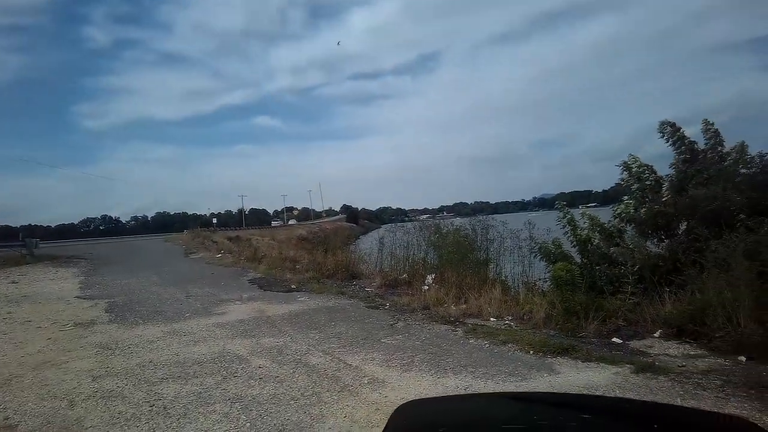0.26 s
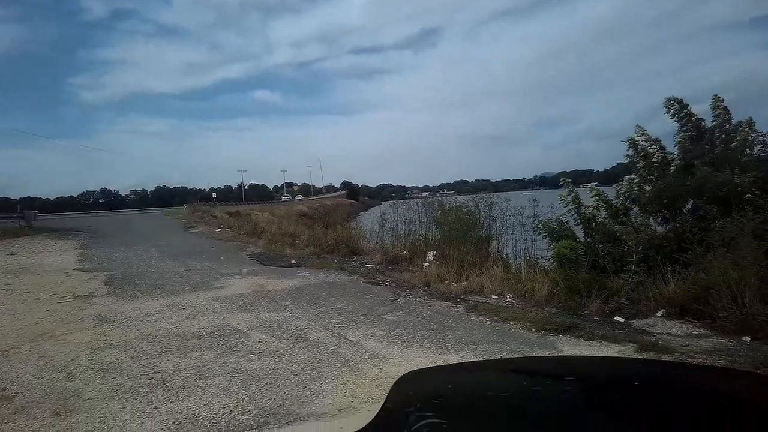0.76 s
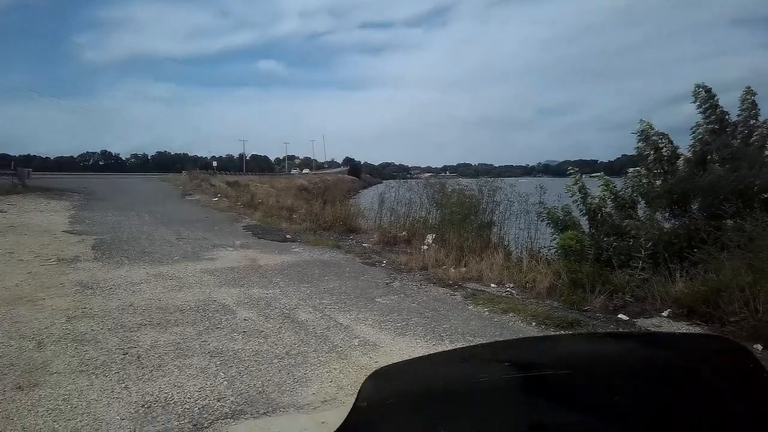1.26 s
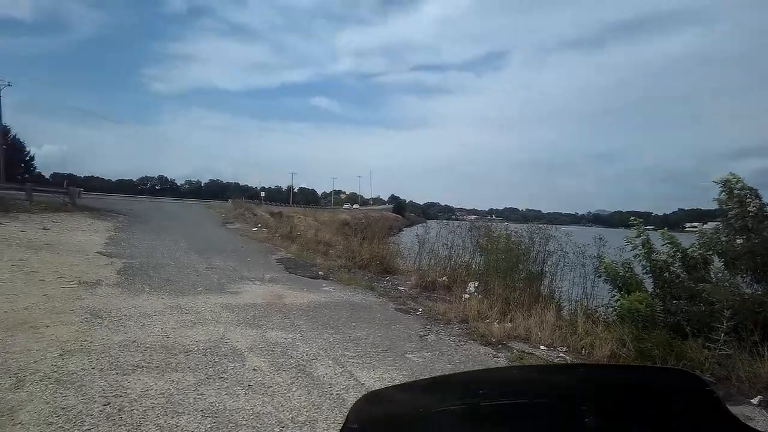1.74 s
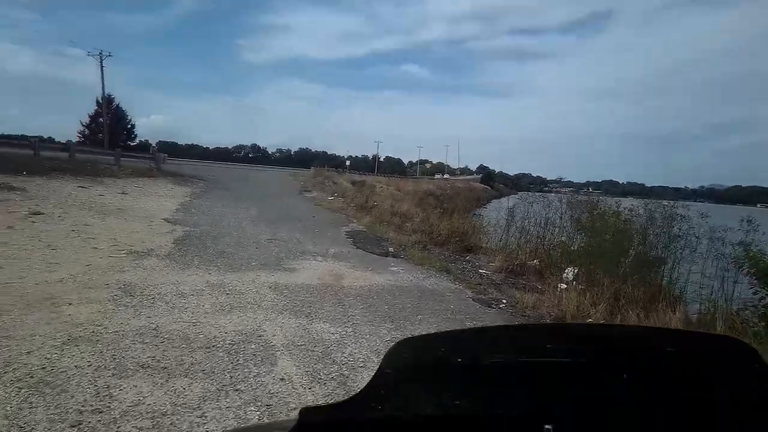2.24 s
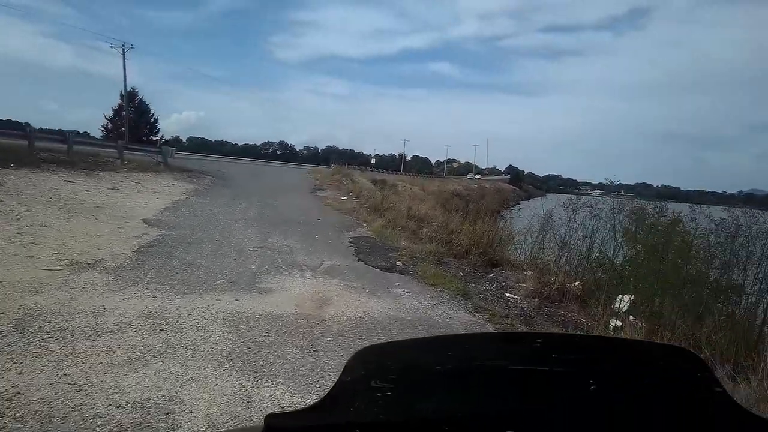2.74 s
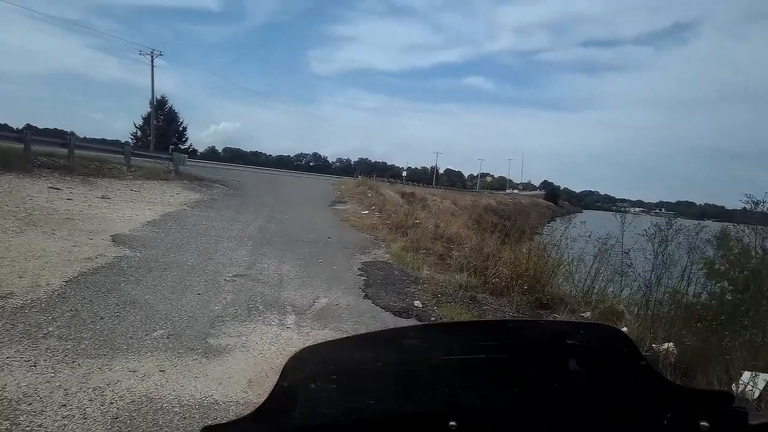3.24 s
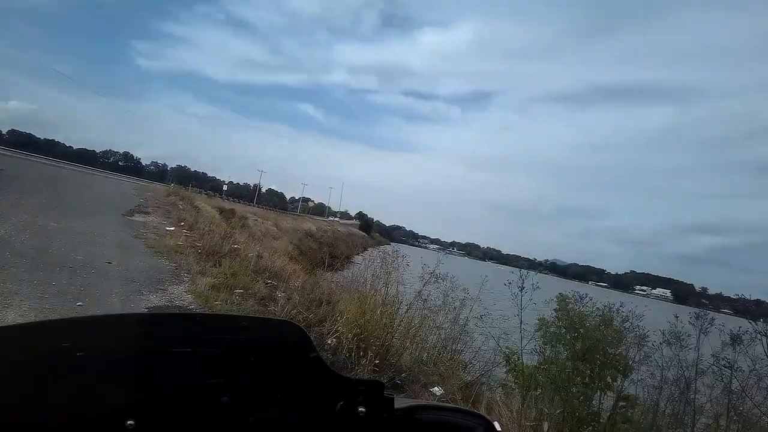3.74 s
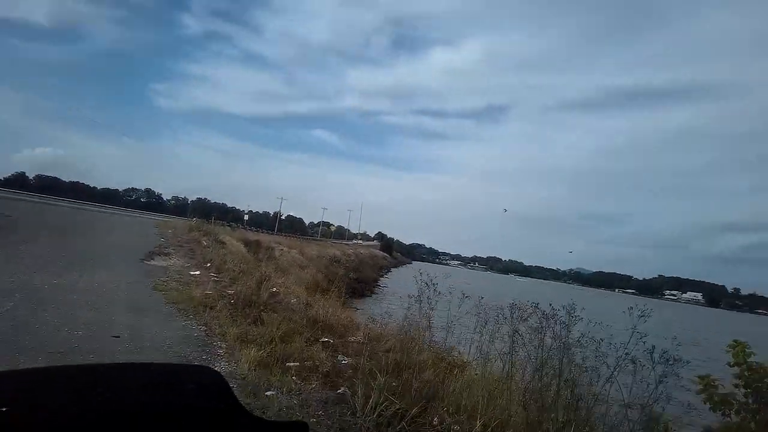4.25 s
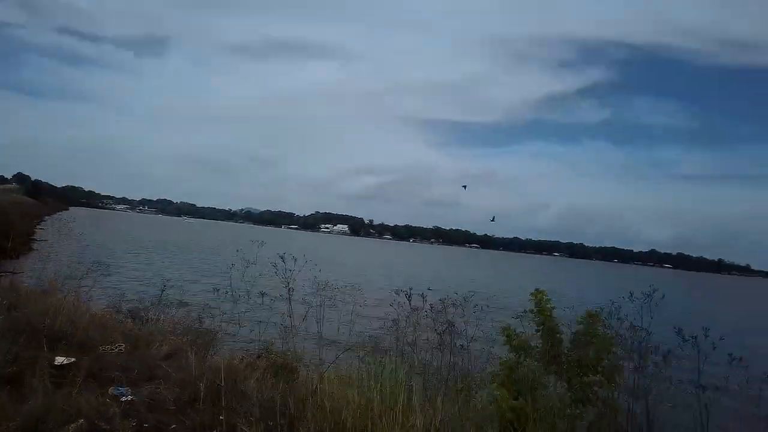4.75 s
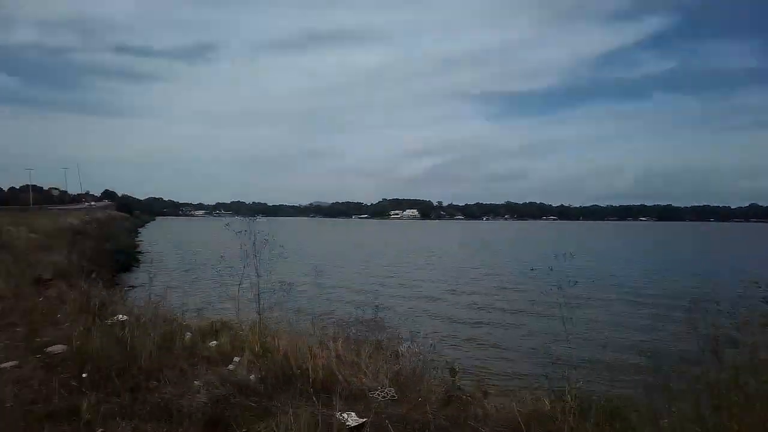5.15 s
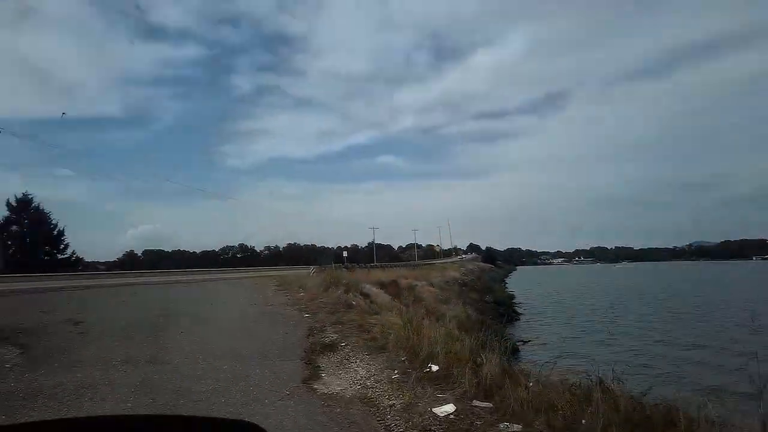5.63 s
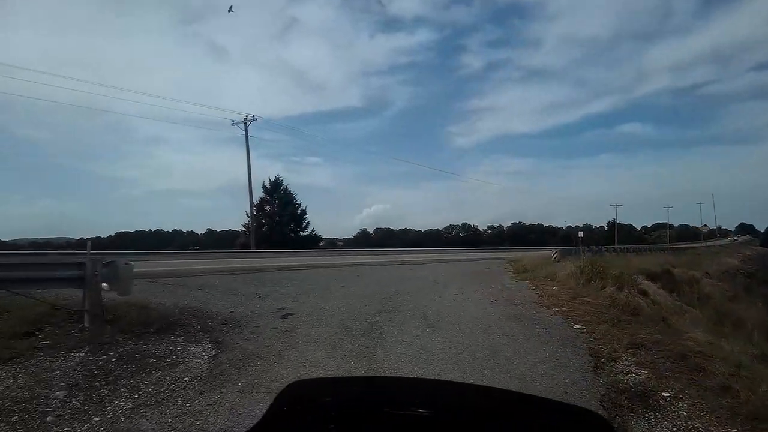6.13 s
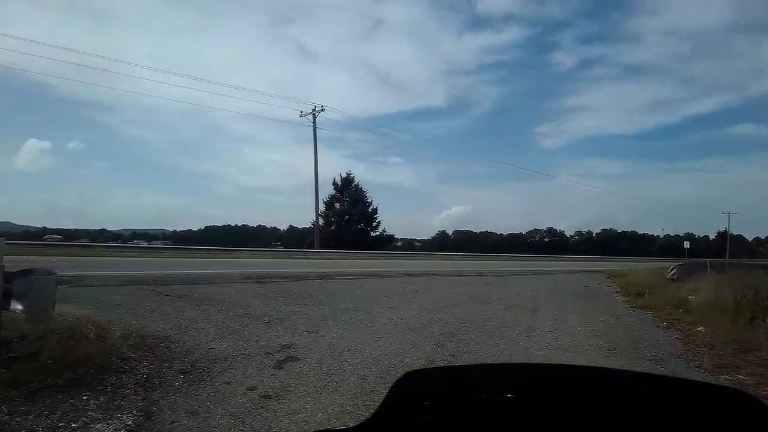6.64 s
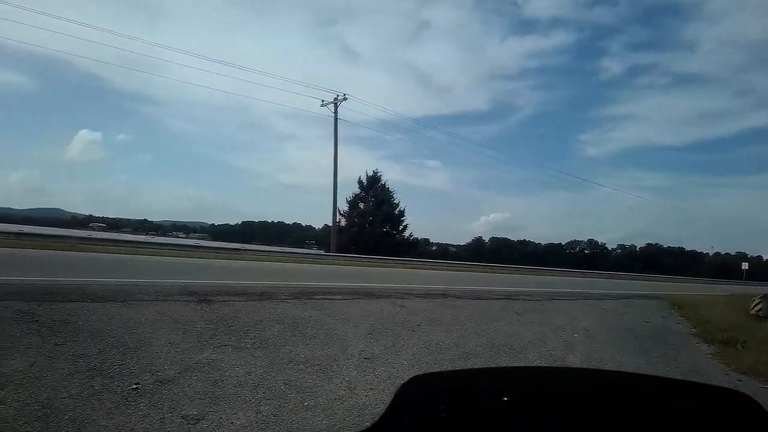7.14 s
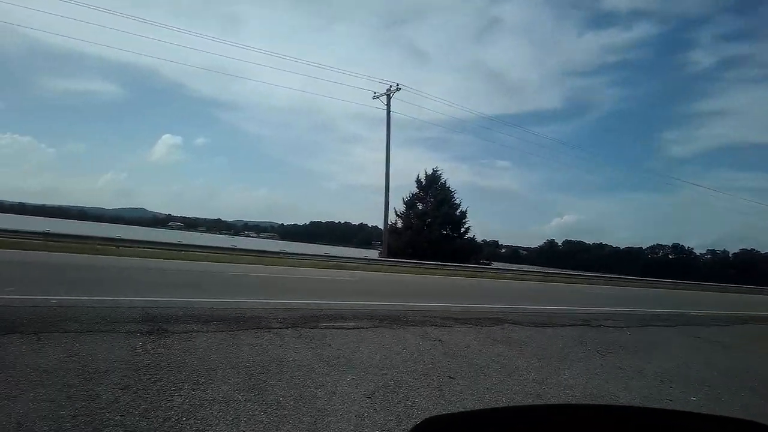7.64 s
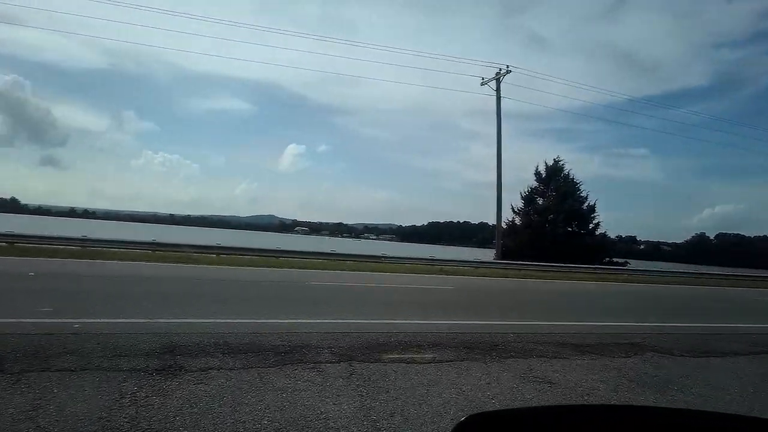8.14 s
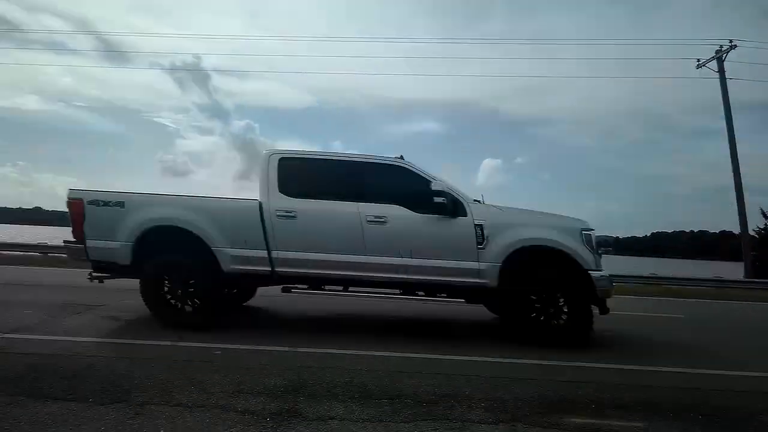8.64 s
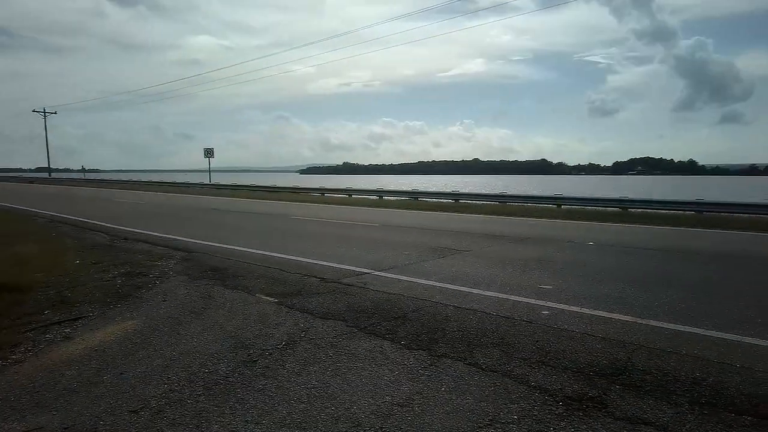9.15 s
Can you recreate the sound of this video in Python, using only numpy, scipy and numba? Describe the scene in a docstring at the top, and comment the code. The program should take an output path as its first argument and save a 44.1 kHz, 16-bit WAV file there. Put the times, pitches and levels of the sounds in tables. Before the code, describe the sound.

A large V-twin throbs directly under two rider-mounted microphones, loud peaks softly overloaded. It rises from loping idle with hard exhaust cracks and loose panel buzz, eases into a smoother low pull, and climbs slightly. Then it runs down through burbling and small gear knocks to idle at an open roadside. A passing truck brings a broad tyre rush and brief tread whine. Faint wind lies underneath.

```python
"""V-twin ride from the saddle

A big V-twin motorcycle on a track: lumpy idle, a blip, a slow pull, then idle at a junction as a pickup passes.
Each firing rings the exhaust, whose pitch glides while the piston rises behind the open valve; gas and valve
gear hiss, a loose panel rasps, hard firings bark, the drive clunks. Two microphones hear the engine unevenly,
the right louder in the bass and mids, and loud peaks overload with a rounded knee."""
import sys
import numpy as np
from scipy import signal
from scipy.fft import rfft, irfft
from scipy.io import wavfile
from scipy.ndimage import uniform_filter1d
from numba import njit

SR = 44100
rng = np.random.default_rng(int(sys.argv[2]) if len(sys.argv) > 2 else 0)


def dump(signal):
    """Clip the signal to [-1, 1] and save it as 16-bit WAV at the path in sys.argv[1]."""
    limited = np.clip(np.atleast_2d(signal).T, -1, 1)
    pcm = np.round(limited * 32767).astype(np.int16)
    wavfile.write(sys.argv[1], SR, pcm)


def level_to_linear(level):
    """Convert decibel levels to linear amplitude factors, elementwise."""
    exponent = np.asarray(level, float) / 20
    return 10 ** exponent


N = 414090
T = np.arange(N) / SR

# open-air hush by frequency: pitch_hz, level_db
AIR_COLOUR = [(30, -18.5), (100, 0), (280, -1), (450, -12.5), (750, -5), (1300, -19), (2000, -23.5),
              (4000, -31), (8000, -38.5), (15000, -40)]
AIR_DB, WIND_DB = -39, -28  # mean levels at the microphones

# passing pickup as the rider's head turns after it:
# time_s, roar_db, roar_hz (before ROAR_SHIFT), hiss_db, hiss_hz, left_minus_right_db
PICKUP_PASS = [(7.5, -55, 804, -74.5, 1660, -13), (8.05, -41.5, 870, -66, 1690, -18.5),
               (8.2, -35.5, 850, -59.5, 1705, -14.5), (8.33, -30.5, 805, -54, 1705, -15.5),
               (8.6, -25, 797, -44, 1760, -12.5), (8.76, -24, 693, -36, 1975, -6.5),
               (8.89, -27, 659, -41.5, 2630, 0.5), (8.97, -28.5, 795, -41, 2550, -2),
               (9.1, -32, 952, -45.5, 2170, 0.5), (9.39, -36, 940, -50, 2190, 2)]
ROAR_SHIFT, ROAR_WIDTH_HZ, HISS_WIDTH_HZ = 1.145, 990, 1100
# tread tone heard from behind the pickup
WHINE_HZ, WHINE_WIDTH_HZ, WHINE_DB, WHINE_FROM_S = 850, 8.8, -7, 8.93
WASH_HZ, WASH_WIDTH_HZ, WASH_DB = 3560, 1100, -26.5  # spray of tread noise, under the roar

# drive and gear clunks: start_s, ring_db, low_knock_db, bright_tick_db
CLUNKS_AT = [(5.1043, -41.5, -14, -36.5), (5.1822, -44, -18, -39.5), (5.4068, -48, -16, -40),
             (7.0738, -55, -23, -40), (7.22, -61, -21.5, -40), (7.2716, -47, -16.5, -33),
             (7.298, -53, -18, -57), (7.332, -55, -18, -37), (7.4118, -63, -20, -35),
             (7.455, -69, -24, -46), (7.518, -68, -30, -48), (7.582, -59, -27, -51), (7.589, -59, -11, -54),
             (7.6297, -62, -27, -47.5), (7.66, -45.5, -17.5, -54), (7.9944, -56.5, -21.5, -37),
             (9.257, -63, -15, -47)]
# metal modes of a clunk: pitch_hz, t60_s, level_db
CLUNK_MODES = [(2370, 0.04, 4), (2950, 0.05, 5.5), (4100, 0.028, -1.5), (5600, 0.03, -28),
               (7130, 0.03, -19), (8260, 0.019, -25), (11460, .02, -25)]
DETUNE = .02  # spread of mode pitch from one clunk to the next, as a share

# hard firings that bark: start_s, crack_db, panel_ring_db, crack_hz
BARKS_AT = [(0.193, -42, -27, 2690), (0.2713, -30, -21, 1770), (0.3614, -33, -31, 3030),
            (0.5455, -40, -21, 3120), (0.6095, -29, -24.5, 2500), (0.6804, -29, -36, 2940),
            (0.7272, -26.5, -20.5, 1860), (0.7845, -47, -24, 2500), (0.824, -32, -25, 1940),
            (0.878, -36, -28, 1860), (0.9153, -28.5, -15.5, 1530), (0.997, -27.5, -17, 1590),
            (1.0412, -33, -29, 1520), (1.0751, -25, -26, 1510), (1.15, -34, -25, 1760),
            (1.4232, -31, -19, 1550), (1.491, -41, -21, 2690), (1.537, -39, -25, 2140),
            (1.5648, -40, -21.5, 1640), (1.61, -35, -19, 1800), (1.6413, -32.5, -18, 1800),
            (1.692, -23, -25.5, 3340), (1.7718, -28, -27, 1710), (1.8546, -27, -30, 1580),
            (1.969, -25, -20, 2860), (2.055, -34, -27, 2000), (2.1, -38, -33, 1750),
            (2.138, -35, -19, 2200), (2.221, -33, -19, 2190), (2.302, -34, -27, 1640),
            (2.3855, -35, -19, 2060), (2.4665, -29.5, -19, 2750), (2.5498, -31, -34, 1920),
            (2.7674, -41, -30, 1780), (5.7267, -41, -20.5, 2220), (6.366, -35, -23, 2000)]
BARK_S, BARK_WIDTH_HZ, BARK_RING_S = 0.015, 1020, 0.088  # crack decay, crack width, panel t60

# frame and tank modes struck by each firing, at the reference speed:
# pitch_hz, width_hz, level_db, rise_db_per_100rpm, rise_hz_per_100rpm
FRAME_MODES = [(234, 8.1, 52.5, 6, 4.5), (390.4, 20, 54.5, 1.1, -1.5)]
# loose panel modes struck by each firing, at the reference speed:
# pitch_hz, width_hz, level_db, rise_db_per_100rpm, rise_hz_per_100rpm
PANEL_MODES = [(771, 35, 52.6, -0.54, 4), (1039, 40, 44.8, -0.19, 7.6)]
RIGHT_LATER_S, PANEL_LATER_S = .0007, .00055  # lags at the right microphone: engine, panel ring
# three body resonances that drift and swell as the rider shifts and the load changes, each: time_s, pitch_hz, level_db
DRIFTING_MODES = [
    [(0, 292, 41.5), (.7, 285, 56), (1.3, 308, 53), (2, 294, 46), (3, 285, 51.5), (4, 295, 43),
     (4.7, 331, 54.5), (5.2, 349, 56.5), (5.7, 337, 53), (6.4, 334, 54), (7, 322, 47), (9.39, 298, 46.5)],
    [(0, 444, 41), (.8, 435, 52), (1.3, 452, 46), (1.7, 465, 53.5), (2.6, 471, 54), (3, 473, 45),
     (4, 459, 46.5), (4.8, 462, 39.5), (6, 455, 46.5), (6.5, 467, 51), (7, 463, 47), (9.39, 452, 40)],
    [(0, 644, 38), (1, 652, 46), (1.6, 631, 51), (2.1, 603, 55), (2.7, 580, 51), (3.3, 571, 47),
     (4.1, 572, 52), (4.7, 592, 50), (5.5, 597, 41), (6.8, 598, 42), (7.2, 586, 37), (9.39, 590, 41)],
]
# width of each drifting resonance: width_hz
DRIFT_WIDTHS = [20, 17, 13]

# engine speed: time_s, crank_rpm
ENGINE_SPEED = [(0.0, 654.4), (0.31, 713.4), (0.44, 589.0), (0.79, 1252.4), (1.22, 1742.4), (1.33, 1811.1),
                (1.69, 1501.3), (1.98, 1423.7), (2.55, 1477.5), (2.8, 1299.1), (3.44, 1327.6),
                (4.13, 1337.0), (4.39, 1462.9), (4.56, 1455.8), (5.01, 1560.8), (6.01, 1706.1),
                (6.83, 1721.8), (7.06, 1159.0), (7.35, 953.8), (7.59, 658.7), (8.81, 686.8), (9.39, 654.3)]
REFERENCE_RPM = 1624
START_CYCLE, REAR_AT = .938, .429  # shares of the four-stroke cycle: done at 0 s, rear cylinder's lag
# throttle: time_s, firing_db, gas_noise_db, panel_rasp_db, gas_treble_db, upper_exhaust_modes_db
THROTTLE_COURSE = [(0, -23, -62, -63, -0.5, -9), (.3, -14.5, -46.5, -29, 2.5, -4),
                   (.5, -15.5, -53, -39, 0, 6), (.6, -13.5, -34, -29, 1.5, 0.5),
                   (.72, -9.5, -31, -28.5, -0.5, 0), (1.1, -7, -29.5, -27.5, 1.5, 4),
                   (1.4, -6, -29.5, -27.5, -2, 6), (1.7, -7.5, -29.5, -29.5, 1, 1),
                   (2.1, -8, -30, -34, -2, 1), (2.55, -7.5, -28.5, -29, -5, -2.5),
                   (2.7, -9.5, -31, -43.5, -3.5, -2.5), (3.4, -8.5, -32, -43.5, -4.5, -4),
                   (4.15, -9, -30.5, -45, -6, -3), (4.4, -8, -29.5, -52, -4.5, 1),
                   (5.1, -7.5, -29.5, -51.5, -2, 1), (5.9, -8, -30.5, -42, -5, 3.5),
                   (6.82, -7.5, -30, -41, -3, 5), (6.95, -9.5, -35.5, -46, 0.5, -8.5),
                   (7.05, -13.5, -35.5, -45, -2, -7), (7.45, -14, -41.5, -56, -1, -15),
                   (7.7, -15.5, -43.5, -41, -2, -15), (8.3, -15.5, -40.5, -52, 4, -9),
                   (8.8, -16, -31, -52, 3.5, 4), (9.39, -16, -33, -51, -3.5, -5)]
# uneven firings off throttle, weaker or stronger than usual: time_s, change_db
UNEVEN_FIRINGS = [(.44, -12), (6.93, 2), (7.015, 3), (7.5, -3.5), (7.6, 3), (7.85, -4), (8.03, -8.5),
                  (8.385, -6.5), (8.735, -10), (9.09, -14)]
# front exhaust modes, before heat, idle and load shift them:
# valve_opens_hz, valve_shuts_hz, open_t60_s, shut_t60_s, level_db, delay_s, polarity
FRONT_EXHAUST = [(44.7, 67, 1.2, 0.11, 0.5, .0033, -1), (109.4, 145.5, 1.2, 0.083, -5, -.0016, -1),
                 (147.6, 190, 0.072, 0.3, -8, .0027, 1), (201, 221, 0.11, 0.027, -11.5, -.0007, 1),
                 (289, 240, 0.15, 0.062, -26.5, .001, 1), (389, 450, 0.16, 0.14, -30, .001, -1)]
# rear exhaust modes, likewise:
# valve_opens_hz, valve_shuts_hz, open_t60_s, shut_t60_s, level_db, delay_s, polarity
REAR_EXHAUST = [(58.1, 79.4, 2.8, 0.12, 0.5, .0038, -1), (115.3, 137.3, 0.53, 0.049, -7, -.0019, -1),
                (153, 152, .6, 0.17, -9, .0025, 1), (194.5, 244, 0.047, 0.37, -10.5, -.0009, 1),
                (258.4, 300, 0.13, 0.17, -24, .001, 1), (384, 395, 0.1, .12, -25, .001, -1)]
LUG_DB = 7.5  # overtone gain if a loaded engine fell from the reference speed to rest
# silencer and engine case resonances, widths before two passes: pitch_hz, width_hz, level_db
CASE_MODES = [(235, 323, 11), (316, 600, -1.5), (467, 280, 3.5), (580, 56, 0), (761, 132, 11.5),
              (1030, 93, 8), (704, 620, 0), (1400, 530, -11.5), (1970, 420, -15.5), (2730, 770, -9),
              (3445, 570, -11.5), (4450, 2270, -22.5), (6860, 5200, -37), (12200, 1700, -42.5)]
# low burble, fuller while the engine runs down: time_s, level_db
BURBLE_COURSE = [(0, -36.5), (.5, -34), (6.9, -26), (7.08, -27), (7.5, -28.5), (7.7, -29.5), (7.86, -25.5),
                 (7.92, -32.5), (9.39, -27.5)]
RASP_HOLD_S = 0.03  # the panel keeps buzzing after each firing

# uneven microphones, for the bike: pitch_hz, left_minus_right_db
MIC_BALANCE = [(60, -6), (110, -5.5), (200, -6), (380, -5), (700, -9), (1290, -7), (2380, -4), (4400, 1),
               (8120, 15), (15000, 2)]


def curve(table, at=T):
    """Columns of a table joined by straight lines."""
    s, *columns = np.transpose(table)
    return [np.interp(at, s, c) for c in columns]


def unit(x):
    """Scale to rms 1."""
    return x / np.sqrt(np.mean(x ** 2))


def noise():
    """White noise, independent at the two microphones."""
    return rng.standard_normal((2, N))


def colour(x, hz, db):
    """Filter by points of pitch and level."""
    f = np.fft.rfftfreq(N, 1 / SR) + 1
    return irfft(rfft(x) * level_to_linear(np.interp(np.log(f), np.log(hz), db)), N)


def band(x, hz, width):
    """Resonance with gain 1 at its centre."""
    return signal.lfilter(*signal.iirpeak(hz, hz / width, SR), x)


def lowpass(x, order, hz):
    """Roll off everything above hz."""
    return signal.sosfilt(signal.butter(order, hz, fs=SR, output="sos"), x)


def walk(rate):
    """Random wander at about rate steps a second, spread near 1."""
    k = int(SR / rate)
    steps = np.repeat(rng.standard_normal(N // k + 1), k)
    return unit(uniform_filter1d(steps, k)[:N])


@njit
def ring(x, hz, loss):
    """One mode whose pitch and damping move every sample."""
    y, z = np.empty(len(x)), 0j
    for i in range(len(x)):
        z = z * np.exp(complex(-loss[i], 2 * np.pi * hz[i] / SR)) + x[i]
        y[i] = z.imag
    return y


def sweep(x, hz, width):
    """Resonance whose centre moves, gain near 1."""
    loss = np.full(N, np.pi * width / SR)
    return 2 * loss * ring(x, hz, loss)


def air():
    """Open-air hush, with wind on the microphones in the bass."""
    hush = unit(colour(noise(), *np.transpose(AIR_COLOUR)))
    wind = unit(band(band(noise(), 37, 50), 37, 50))
    return level_to_linear(AIR_DB + .4 * walk(1.5)) * hush + level_to_linear(WIND_DB + 3 * walk(3)) * wind


def tyre(hz, width):
    """Tyre noise through a moving resonance, applied twice."""
    return unit(np.array([sweep(sweep(v, hz, width), hz, width) for v in noise()]))


def pickup():
    """Tyre roar, a hiss above it and a late tread tone; it moves from the right microphone to the middle."""
    roar_db, roar_hz, hiss_db, hiss_hz, pan_db = curve(PICKUP_PASS)
    limits = signal.butter(3, [470, 1750], "band", fs=SR, output="sos")
    roar = unit(signal.sosfilt(limits, tyre(ROAR_SHIFT * roar_hz, ROAR_WIDTH_HZ)))
    whine = unit(band(rng.standard_normal(N), WHINE_HZ, WHINE_WIDTH_HZ))
    whine = whine * np.clip((T - WHINE_FROM_S) / .06, 0, 1)
    wash = unit(band(band(noise(), WASH_HZ, WASH_WIDTH_HZ), WASH_HZ, WASH_WIDTH_HZ))
    hiss = tyre(hiss_hz, HISS_WIDTH_HZ) + level_to_linear(-22) * unit(band(noise(), 5500, 3500))
    tyres = level_to_linear(roar_db) * (roar + level_to_linear(WASH_DB) * wash + level_to_linear(WHINE_DB) * whine) + level_to_linear(hiss_db) * hiss
    return level_to_linear(np.array([pan_db, -pan_db]) / 2 + 1.0 * walk(12)) * tyres


def clunks():
    """Short metal knocks of drive and gears: ringing modes, a low knock and a bright tick."""
    out, t = np.zeros((2, N)), np.arange(int(.1 * SR)) / SR
    for s, ring_db, low_db, tick_db in CLUNKS_AT:
        chance = rng.standard_normal((2, len(CLUNK_MODES), 2))
        low_burst, tick_burst = rng.standard_normal((2, 2, len(t)))
        knock = band(band(low_burst * np.exp(-t / 0.0099), 950, 700), 750, 900)
        tick = band(tick_burst * np.exp(-t / 0.0023), 3400, 4500)
        hit = 0
        for k, (hz, t60, mode_db) in enumerate(CLUNK_MODES):
            level_chance, pitch_chance = chance[0, k, :, None], chance[1, k]
            tone = np.sin(2 * np.pi * hz * (1 + DETUNE * pitch_chance[0]) * t)
            hit = hit + level_to_linear(mode_db + 1.5 * level_chance) * tone * 1000. ** (-t / t60)
            # a sharp contact also stirs the modes regardless of their own levels and is damped at once
            tone = np.sin(2 * np.pi * hz * (1 + 2 * DETUNE * pitch_chance[1]) * t)
            contact_db = 3.1 * level_chance - 3.5 * np.log2(hz / 4000)
            tick = tick + 0.2 * level_to_linear(contact_db) * tone * 1000. ** (-t / 0.0093)
        i = int(s * SR)
        out[:, i:i + len(t)] += level_to_linear(ring_db) * hit + level_to_linear(low_db) * knock + level_to_linear(tick_db) * tick
    return out


def barks():
    """A hard firing cracks in the treble and rings the loose panel."""
    out, t = np.zeros((2, N)), np.arange(int(.08 * SR)) / SR
    for s, crack_db, ring_db, hz in BARKS_AT:
        puff = np.exp(-t / BARK_S) * np.minimum(t / 0.0018, 1)
        burst = rng.standard_normal((2, len(t))) * puff
        crack = band(band(burst, hz, BARK_WIDTH_HZ), hz, 2 * BARK_WIDTH_HZ)
        crack = 3 * lowpass(crack, 4, 3700)
        over = (curve(ENGINE_SPEED, s)[0] - REFERENCE_RPM) / 100
        panel = 0
        for k, (mode_hz, *_, rise_hz) in enumerate(PANEL_MODES):
            panel = panel + level_to_linear(-5.5 * k) * np.cos(2 * np.pi * (mode_hz + rise_hz * over) * t)
        panel = panel * 1000. ** (-t / BARK_RING_S) * np.minimum(t / 0.0011, 1)
        panel = np.array([panel, np.roll(panel, int(PANEL_LATER_S * SR))])
        i = int(s * SR)
        out[:, i:i + len(t)] += level_to_linear(crack_db) * crack + level_to_linear(ring_db) * panel
    return out


def leading_edge(gate):
    """The rise of each gas puff, which is what strikes the metal."""
    return np.maximum(np.diff(gate, prepend=0), 0)


def struck(gate, modes, later_s):
    """Modes rung by the leading edge of each gas puff, later at the right microphone."""
    blow, y = leading_edge(gate), 0
    over = (curve(ENGINE_SPEED)[0] - REFERENCE_RPM) / 100
    for hz, width, db, rise_db, rise_hz in modes:
        level = level_to_linear(db + rise_db * np.maximum(over, -3.5) + 1.7 * walk(3.3))
        y = y + level * band(sweep(blow, hz + rise_hz * over, width), hz, 8 * width)
    return np.array([y, np.roll(y, int(later_s * SR))])


def drifting(gate):
    """Moving body resonances rung by the leading edge of each gas puff."""
    blow, y = leading_edge(gate), 0
    for table, width in zip(DRIFTING_MODES, DRIFT_WIDTHS):
        hz, db = curve(table)
        y = y + level_to_linear(db + 0.65 * walk(3.3)) * sweep(sweep(blow, hz, width), hz, 8 * width)
    return y


def burble():
    """Uneven low rumble beneath the engine, alike at both microphones."""
    rumble = unit(band(band(rng.standard_normal(N), 85, 90), 100, 200))
    return level_to_linear(curve(BURBLE_COURSE)[0] + 2.35 * walk(14)) * rumble


def panel_rasp(gate_front, gate_rear):
    """A loose panel rasps and rings at each firing while the engine labours off idle."""
    hold = int(RASP_HOLD_S * SR)
    gate = gate_front + gate_rear
    buzz = uniform_filter1d(gate, hold, origin=(hold - 1) // 2)  # mean of the time just past
    shake = noise() * (.5 * gate + 0.88 * buzz)
    high = band(band(lowpass(shake, 4, 3700), 2700, 2000), 2700, 2400)
    low = band(band(shake, 730, 260), 740, 300)
    return high + level_to_linear(3.5) * low + struck(gate_front + 1.54 * gate_rear, PANEL_MODES, PANEL_LATER_S)


def gas_noise(gate_front, gate_rear, load, treble_db):
    """Gas and valve-gear hiss through silencer and case, only partly shared and later at the right."""
    gate = 0.3 + 0.27 * load + gate_front + 1.6 * gate_rear
    shared = rng.standard_normal(N)
    shared = np.array([shared, np.roll(shared, int(RIGHT_LATER_S * SR))])
    rattle = (noise() + .8 * shared) * level_to_linear(2.3 * rng.exponential(size=N))  # spiky
    gas = 0
    for k, (hz, width, mode_db) in enumerate(CASE_MODES):
        # the treble holds more steady valve-gear hiss
        source = np.roll(rattle, 1000 * k, axis=1) * (gate + hz / 6000)
        level = level_to_linear(mode_db + 2.0 * walk(25) + treble_db * (hz > 2400))
        gas = gas + level * band(band(source, hz, 1.78 * width), hz, 1.75 * width)
    return unit(gas)


def crank():
    """Four-stroke cycles done at each sample: one for every two turns."""
    return START_CYCLE + np.cumsum(curve(ENGINE_SPEED)[0]) / (60 * 2 * SR)


def cylinder(cycles, db, load, upper_db, pipe):
    """Firings of one cylinder: exhaust ring, and the gate that opens gas noise."""
    fired = np.flatnonzero(np.diff(np.floor(cycles)) > 0)
    chance = rng.standard_normal((2, len(fired)))
    extra_db = (1.4 - 1.47 * load[fired]) * chance[0]
    for s, change_db in UNEVEN_FIRINGS:
        extra_db += change_db * (abs(T[fired] - s) < .025)
    kick, puff = np.zeros((2, N))
    kick[fired] = level_to_linear(extra_db + db[fired])
    puff[fired] = level_to_linear(extra_db + 1.53 * chance[1])

    stroke = cycles % 1 / (.31 - 0.051 * load)  # 0-1 while the exhaust valve is open
    glide = np.minimum(stroke, 1) ** (1.9 - 0.65 * load)
    heat = 1 + .11 * load  # hot gas carries sound faster
    lug_db = LUG_DB * load * (1 - curve(ENGINE_SPEED)[0] / REFERENCE_RPM)
    overtone_db = lug_db - 3.2 * (1 - load)  # gentle firings stir the overtones less
    out = 0
    for k, (open_hz, shut_hz, t_open, t_shut, mode_db, delay, sign) in enumerate(pipe):
        # at idle the glide sits higher
        open_hz, shut_hz = open_hz + 6 * (1 - load), shut_hz + 11 * (1 - load)
        # the rising piston shrinks the volume behind the pipe
        hz = heat * (open_hz + (shut_hz - open_hz) * glide)
        t60 = np.where(stroke < 1, t_open, t_shut * (0.68 + 0.35 * load))
        mode = np.roll(ring(kick, hz, np.log(1000) / SR / t60), int(delay * SR))
        out = out + sign * level_to_linear(mode_db + overtone_db * (k > 0) + upper_db * (k > 2)) * mode
    fall = np.exp(-1 / (.014 * SR))
    late_puff = np.roll(puff, int(.003 * SR))  # gas trails the pressure front
    return out, signal.lfilter([1], [1, -fall], late_puff)


def engine():
    """Both cylinders and what they shake; the exhaust throb is alike at both microphones."""
    db, gas_db, rasp_db, treble_db, upper_db = curve(THROTTLE_COURSE)
    load = np.clip((db + 15.5) / 5.5, 0, 1)
    cycles = crank()
    front, gate_front = cylinder(cycles, db, load, upper_db, FRONT_EXHAUST)
    rear, gate_rear = cylinder(cycles - REAR_AT, db, load, upper_db, REAR_EXHAUST)
    throb = level_to_linear(1.69) * lowpass(front + rear, 2, 450)
    gate = gate_front + gate_rear
    gas = gas_noise(gate_front, gate_rear, load, treble_db)
    body = struck(gate, FRAME_MODES, RIGHT_LATER_S) + drifting(gate)
    rasp = level_to_linear(rasp_db) * panel_rasp(gate_front, gate_rear)
    return rasp + burble() + throb + level_to_linear(gas_db) * (gas + body)


def scene():
    """Bike sounds take the microphones' uneven balance; pickup and air are added as they are."""
    hz, db = np.transpose(MIC_BALANCE)
    left, right = engine() + clunks() + barks()
    bike = np.array([colour(left, hz, db / 2), colour(right, hz, -db / 2)])
    return bike + pickup() + air()


def top_cut(x):
    """Nothing passes above the cut-off."""
    return signal.sosfilt(signal.butter(12, 15660, fs=SR, output="sos"), x)


def record(dry):
    """Microphone bass roll-off, then overload with a rounded knee."""
    x = signal.sosfilt(signal.butter(3, 45, "high", fs=SR, output="sos"), dry)
    x = x / (1 + abs(x) ** 10) ** .1
    return top_cut(x)


dry = scene()
out = record(dry)
dump(out)
```